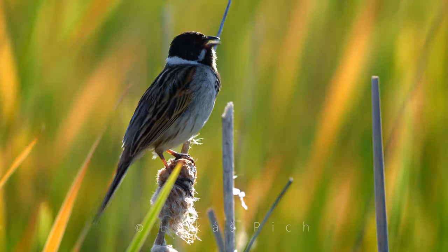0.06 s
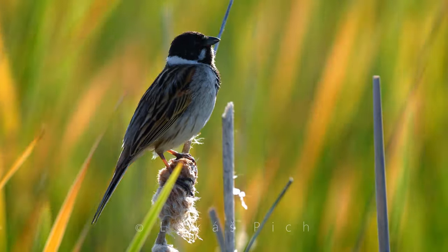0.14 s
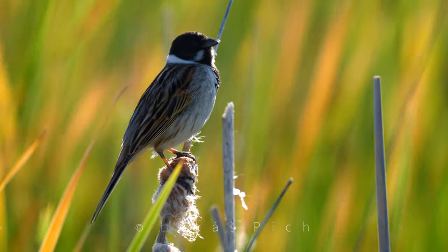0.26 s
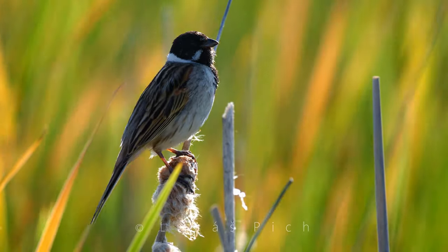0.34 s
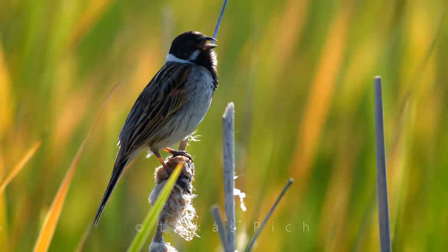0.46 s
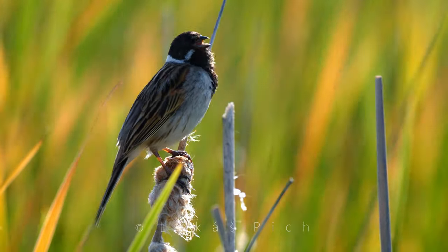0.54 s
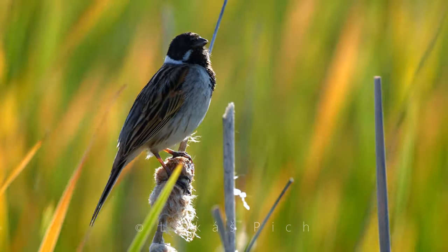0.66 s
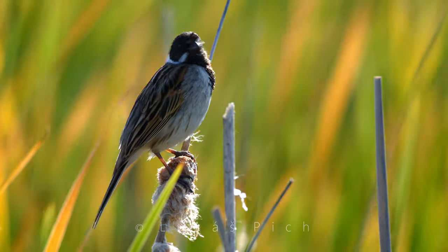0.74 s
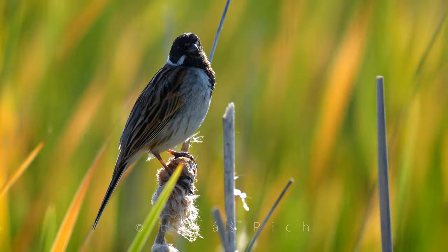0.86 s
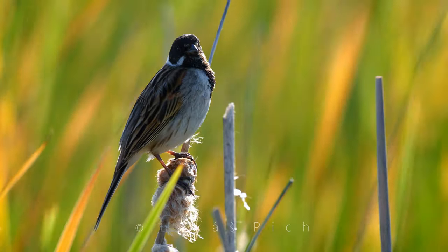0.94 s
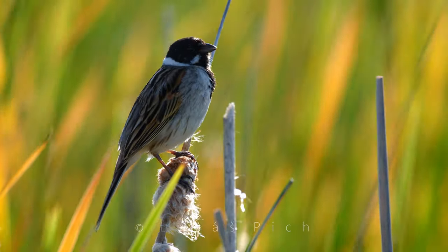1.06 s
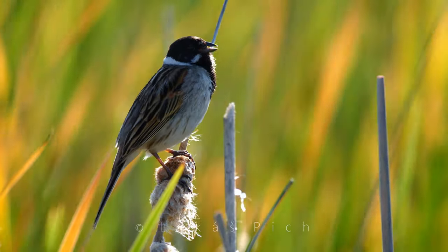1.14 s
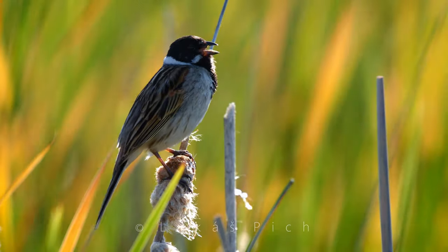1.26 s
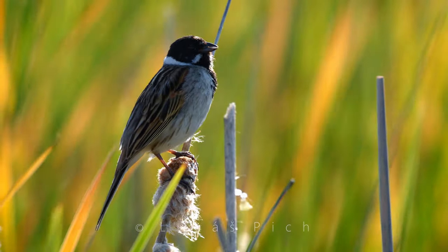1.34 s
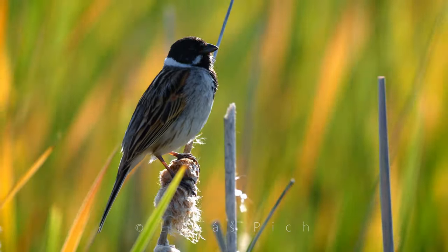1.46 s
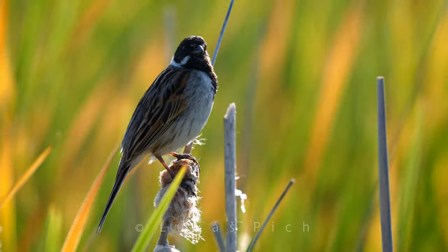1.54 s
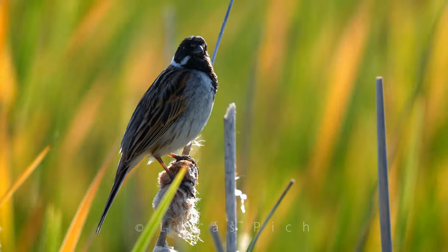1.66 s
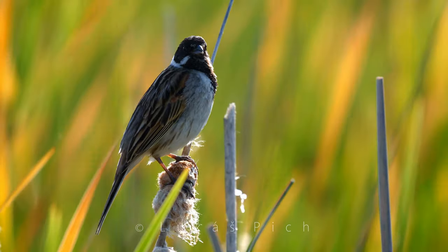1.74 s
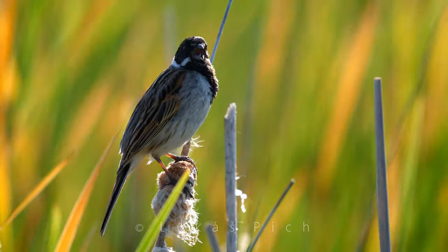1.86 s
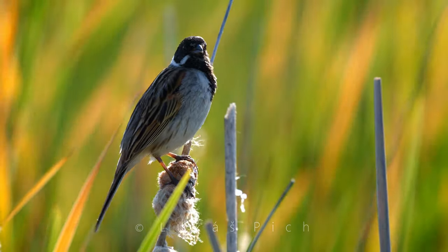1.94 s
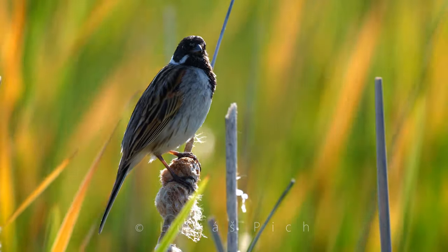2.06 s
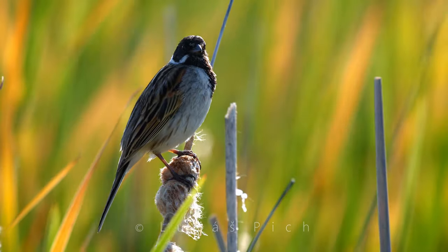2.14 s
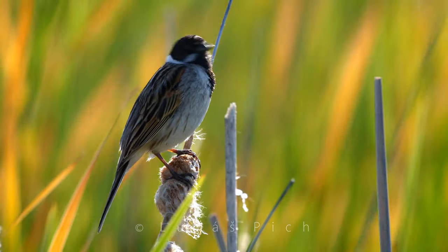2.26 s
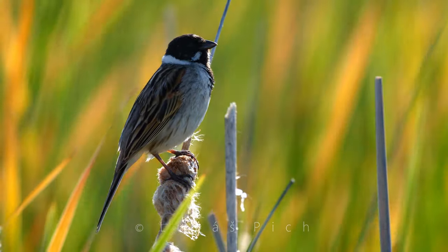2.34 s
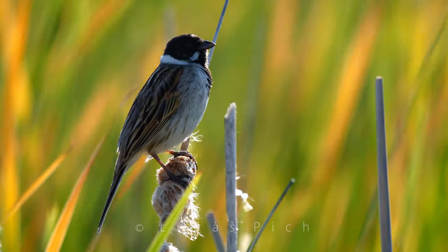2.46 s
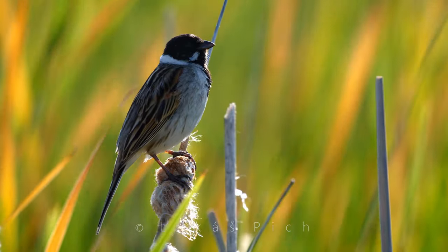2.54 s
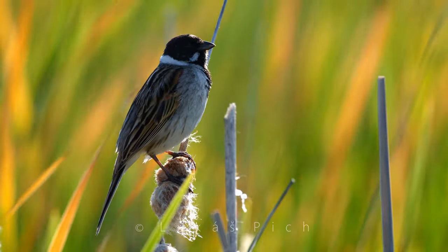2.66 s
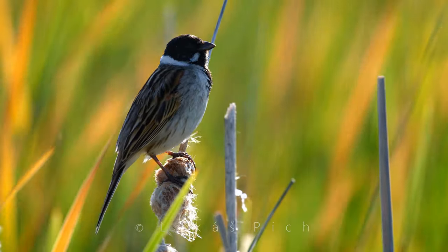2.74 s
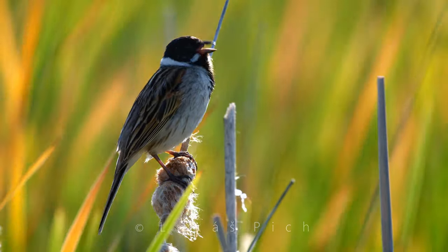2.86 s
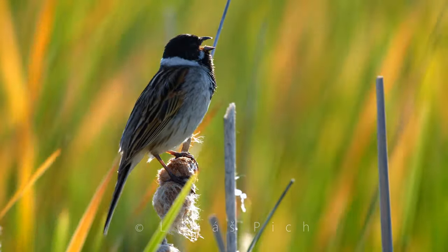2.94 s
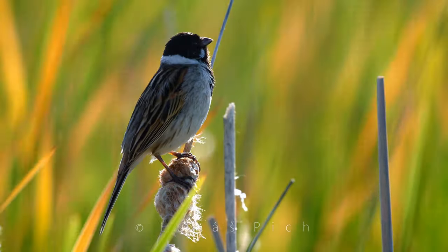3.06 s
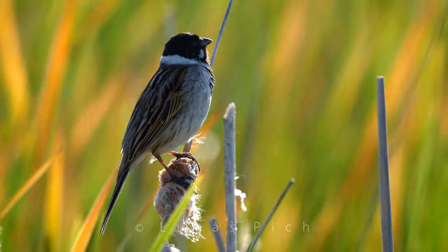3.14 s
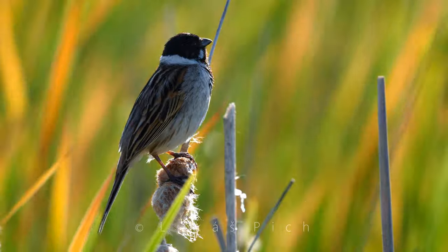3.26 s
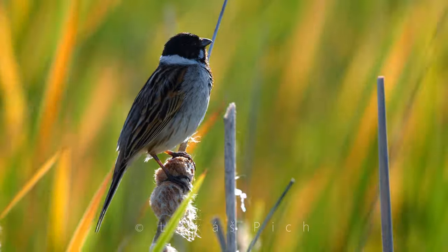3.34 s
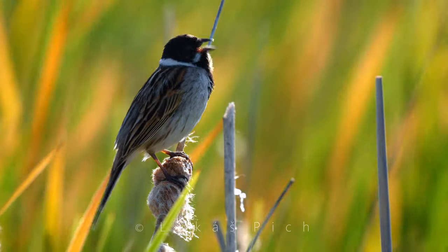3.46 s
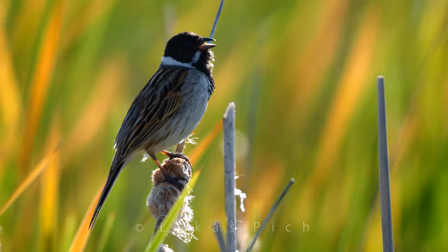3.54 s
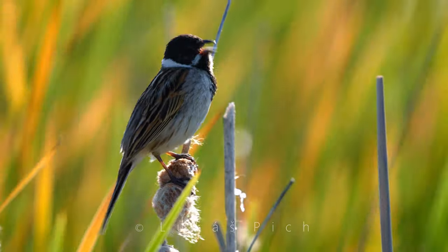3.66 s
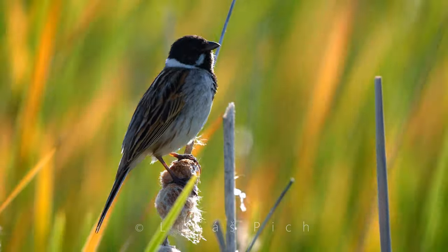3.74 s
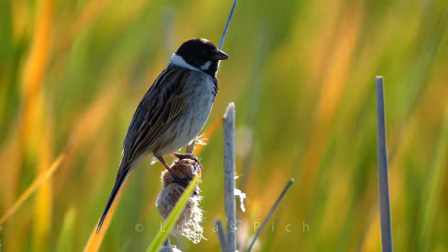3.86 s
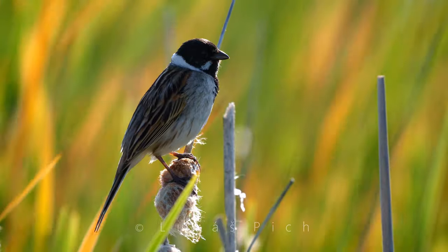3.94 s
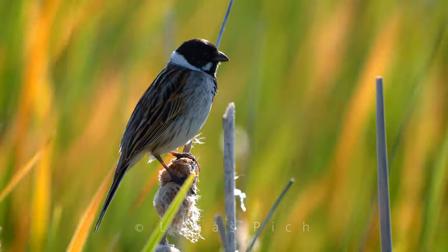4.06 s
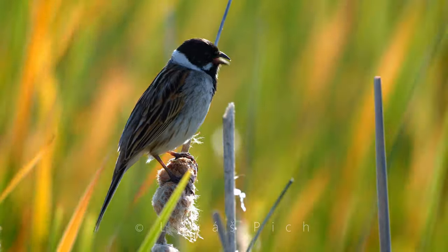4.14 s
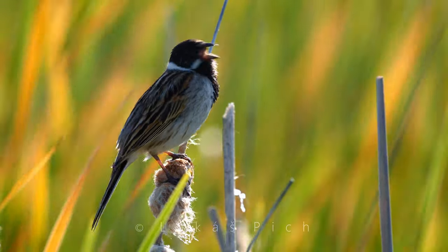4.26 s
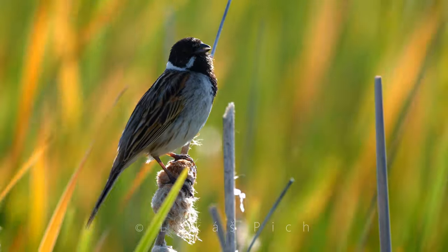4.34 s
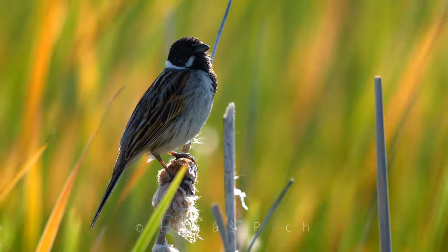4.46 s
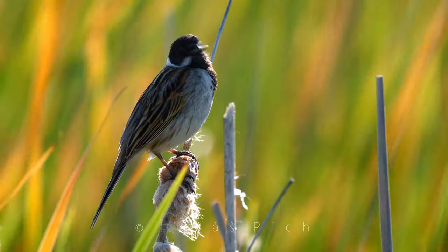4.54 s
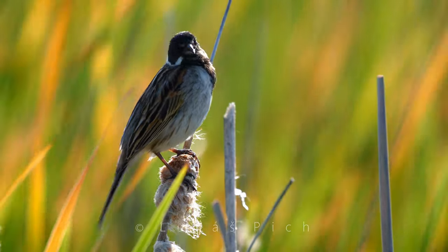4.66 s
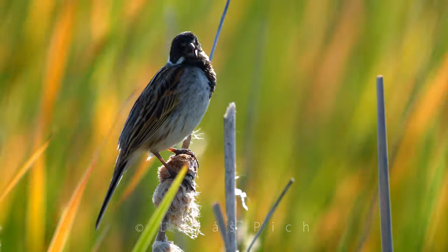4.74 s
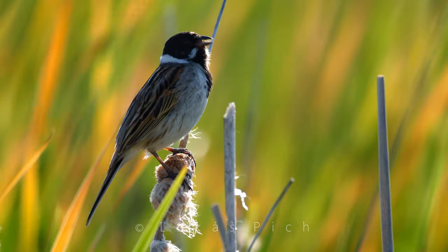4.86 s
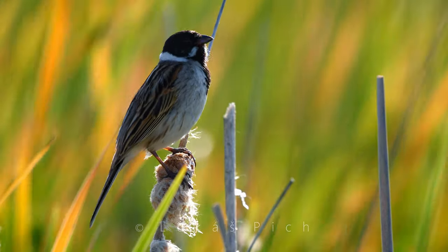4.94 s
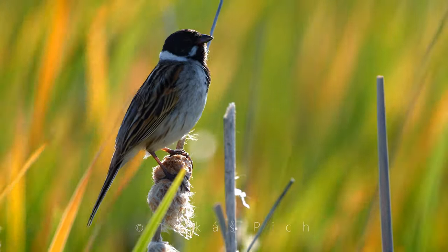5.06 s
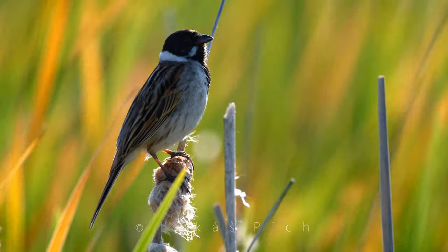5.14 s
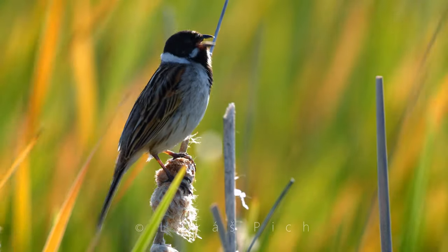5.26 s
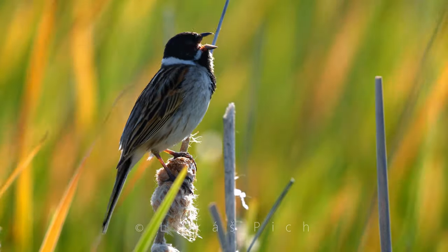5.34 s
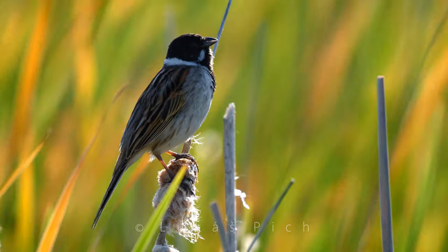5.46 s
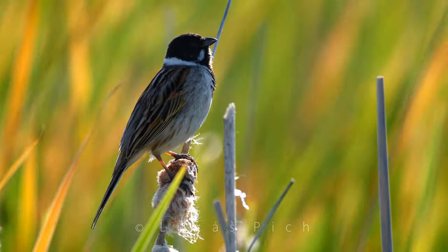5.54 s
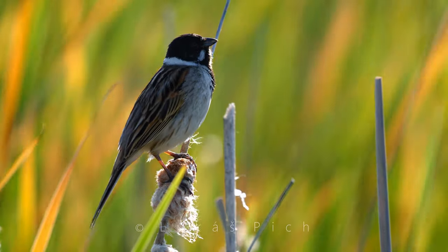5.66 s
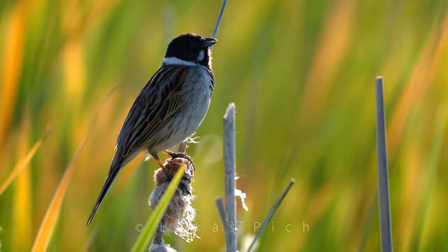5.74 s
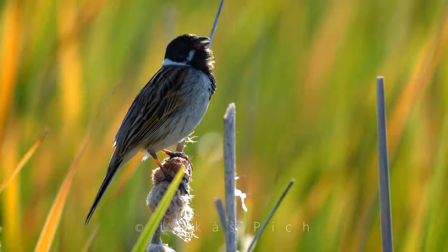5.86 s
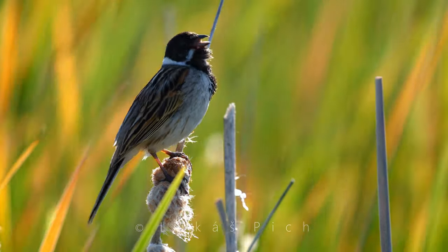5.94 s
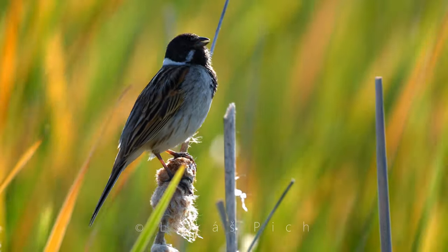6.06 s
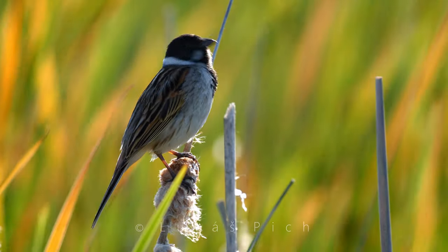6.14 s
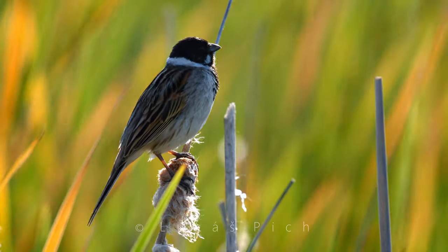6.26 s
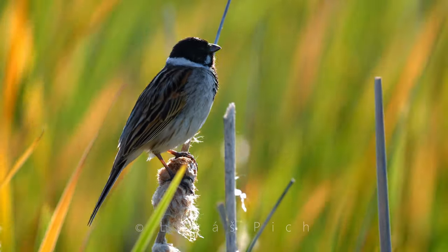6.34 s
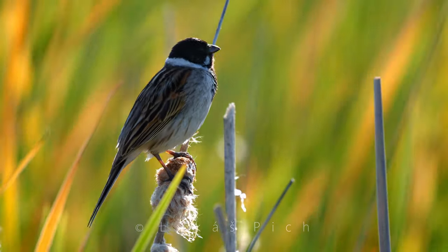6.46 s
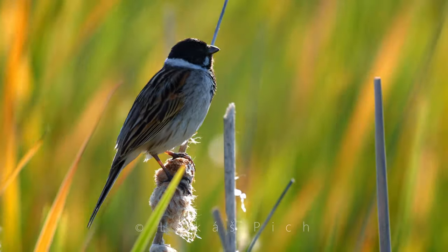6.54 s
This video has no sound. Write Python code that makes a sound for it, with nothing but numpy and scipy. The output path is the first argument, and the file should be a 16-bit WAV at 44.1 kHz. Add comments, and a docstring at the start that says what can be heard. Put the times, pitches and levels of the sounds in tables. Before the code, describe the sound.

Close, high chirps, upward slurs and brief buzzes from one songbird in a quiet marsh, while other birds twitter faintly further off.

```python
"""In an open marsh a male reed bunting sings from a bulrush head: rising slurs, paired chirps, buzzes.
Each note is one gliding tone, filtered by the resonance of throat and beak; a fast trill modulates
its frequency and swings it across that resonance. Scattering in the reed bed adds a short tail.
Other birds call further off, over a soft hush of air, dry stems and a faint low drone."""
import sys
import numpy as np
from scipy import signal
from scipy.fft import rfft, irfft
from scipy.io import wavfile
from scipy.ndimage import uniform_filter1d, map_coordinates

SR = 44100
rng = np.random.default_rng(int(sys.argv[2]) if len(sys.argv) > 2 else 0)


def put_to_file(sound):
    """Save the sound as 16-bit audio at rate SR, in the file named by the first command-line argument."""
    columns = np.atleast_2d(sound).T  # one column per channel
    safe = np.clip(columns, -1, 1)
    whole_steps = np.round(safe * 32767)
    wavfile.write(sys.argv[1], SR, whole_steps.astype(np.int16))


N = 291060


def undb(db):
    """Amplitude ratio of a level in decibels."""
    return 10 ** (np.asarray(db) / 20)


def unit(x):
    """Normalisation to rms 1."""
    return x / np.sqrt(np.mean(x ** 2))


def add(track, start, sound):
    """Superposition: a sound sums into a track from a start time on."""
    at = int(round(start * SR)) + np.arange(len(sound))
    inside = (at >= 0) & (at < N)
    track[at[inside]] += sound[inside]


def wander(size, rate):
    """Random modulation: a smooth curve of spread near 1, with rate new values a second."""
    steps = np.arange(size) * rate / SR
    return map_coordinates(rng.standard_normal(4096), [steps + 8], order=2, mode="wrap")


def coloured(spectrum):
    """Spectral shaping: noise of rms 1 that follows (frequency [Hz], relative level [dB]) points."""
    hz, db = np.transpose(spectrum)
    bins = np.maximum(np.arange(N // 2 + 1) * SR / N, 1)
    gain = undb(np.interp(np.log(bins), np.log(hz), db))
    return unit(irfft(rfft(rng.standard_normal(N)) * gain, N))


def resonance(x, hz, width_hz):
    """A second-order resonator, gain 1 at its centre."""
    return signal.lfilter(*signal.iirpeak(hz, hz / width_hz, fs=SR), x)


def syrinx(hz, second_db, third_db):
    """Harmonic series: three partials whose phase is the integral of a frequency curve."""
    phase = 2 * np.pi * np.cumsum(hz) / SR
    partials = enumerate((0, second_db, third_db), 1)
    return sum(undb(db) * np.sin(k * phase) * (k * hz < SR / 2) for k, db in partials)


def arc(length, start_hz, middle_hz, end_hz):
    """A parabolic glide through three frequencies, and its rounded amplitude envelope."""
    u = np.linspace(0, 1, int(length * SR))
    parabola = np.polyfit([0, .5, 1], [start_hz, middle_hz, end_hz], 2)
    return np.polyval(parabola, u), np.sqrt(np.abs(np.sin(np.pi * u)))


def ramp(t, length):
    """A raised-cosine step from 0 to 1 that starts at t = 0."""
    return np.sin(np.pi / 2 * np.clip(t / length, 0, 1)) ** 2


def sing(t, hz, db, attack_s, release_s):
    """Jitter and shimmer: the bunting's nearly pure tone, slightly unsteady in pitch and airflow."""
    hz = hz * (1 + .0008 * wander(len(t), 700))
    airflow = undb(db + wander(len(t), 140)) * ramp(t - t[0], attack_s) * ramp(t[-1] - t, release_s)
    return airflow * syrinx(hz, -56, -48)


def swing(cycle, depth_hz):
    """Frequency modulation of a trill: lowest at whole cycles, slightly uneven in depth."""
    return -depth_hz * np.cos(2 * np.pi * cycle) * (1 + .06 * wander(len(cycle), 120))


def scatter(x, near_db, near_t60, far_db, far_t60):
    """Multiple scattering: exponentially decaying echoes from close stems and the wider reed bed."""
    t = np.arange(SR) / SR
    response = 0
    for db, t60 in ((near_db, near_t60), (far_db, far_t60)):
        echo = rng.standard_normal(SR) * undb(-60 * t / t60) * (1 - np.exp(-t / .0039))
        response = response + undb(db) * echo / np.linalg.norm(echo)
    return signal.fftconvolve(x, response)[:N]


# air over the marsh: (frequency [Hz], relative spectral density [dB])
HUSH_SPECTRUM = [(25, -13.5), (80, -15.5), (105, -5.5), (145, 3), (230, -4), (340, -1), (580, 1.5),
                 (900, -4), (1400, -6.5), (2200, -10), (4000, -10), (7000, -17), (12000, -22.5),
                 (16000, -23.5)]
def hush(level_db=-54.5):
    """Broadband ambient noise with a slight, slow amplitude modulation."""
    return coloured(HUSH_SPECTRUM) * undb(level_db + .4 * wander(N, 3))


# leaves brushing together: (peak time [s], half length [s], level [dB])
LEAF_RUSTLES = [(2.366, 0.022, -64), (2.84, 0.084, -66), (3.13, .04, -63), (3.55, 0.37, -68),
                (4.04, 0.039, -75)]
# dry stems ticking: (time [s], level [dB])
STEM_TICKS = [(3.139, -43), (3.779, -50), (4.0297, -46), (4.246, -47), (6.1302, -47.5), (6.316, -44)]
def reeds(steady_db=-76, tick_s=.0022):
    """Friction noise swells as leaves brush together; stem ticks are damped noise transients."""
    t = np.arange(N) / SR
    swells = sum(undb(db) * np.exp(-((t - at) / half) ** 2) for at, half, db in LEAF_RUSTLES)
    rubbing = (undb(steady_db) + swells) * undb(1.2 * wander(N, 150))
    out = rubbing * coloured([(500, -16.5), (4000, -1), (9000, 4), (12500, 0), (16000, -1.5)])
    t = t[:SR // 50]
    for start, db in STEM_TICKS:
        add(out, start, undb(db) * np.exp(-t / tick_s) * rng.standard_normal(len(t)))
    return out


# envelope of a distant drone: (time [s], level [dB])
DRONE_LEVELS = [(0, -85), (2.5, -82), (3.0, -64), (3.602, -79), (4.6, -69.5), (5.4, -64.5), (6.0, -81),
                (6.6, -78)]
def drone(hz=316.7, width_hz=41):
    """Narrow-band noise: two resonators in series leave a low, wavering hum."""
    band = resonance(rng.standard_normal(N), hz, width_hz)
    band = resonance(band, hz, width_hz)
    return unit(band) * undb(np.interp(np.arange(N) / SR, *np.transpose(DRONE_LEVELS)))


def chorus(count=220, level_db=-62, spread_db=3, fading_db=4):
    """A diffuse field: very distant birds twitter at random, slowly quietening, heard only as echoes."""
    out = np.zeros(N)
    for when, length, height, bend, size in rng.random((count, 5)):
        centre_hz = 1300 * 3.4 ** height
        start_hz, end_hz = centre_hz * (1 + .271 * (bend - .5)), centre_hz * (1 - .22 * (bend - .5))
        hz, swell = arc(.015 + .06 * length, start_hz, centre_hz, end_hz)
        db = level_db + spread_db * (2 * size - 1) + fading_db * (.5 - when)
        add(out, when * N / SR, undb(db) * swell * syrinx(hz, -16, -39))
    return scatter(out, -.63, .09, .42, .2)


# airflow through a slur: (time from the crest before stretching [s], drive [dB])
SLUR_AIRFLOW = [(-.188, -33), (-.165, -20.5), (-.14, -19.5), (-.1, -15.5), (-.06, -12), (-.02, -14),
                (-.004, -18.5), (.008, -20), (.016, -34)]
# the bunting's slurs: (crest time [s], crest frequency [Hz], gain [dB], stretch [ratio])
RISING_SLURS = [(.0872, 4860, 2, 1.14), (3.7105, 4920, -.4, .97), (6.0815, 4850, .4, .96)]
def slurs(climb_oct_per_s=4.3, surge_oct=.125, surge_s=.018, hook_oct_per_s=2.8, dip_oct=.15, dip_s=.009):
    """Frequency sweep: each whistle dips, climbs ever faster and hooks over at the top."""
    out = np.zeros(N)
    knots, drive = np.transpose(SLUR_AIRFLOW)
    for at, crest_hz, db, stretch in RISING_SLURS:
        t = np.arange(knots[0] * stretch, knots[-1] * stretch, 1 / SR)
        u = t / stretch  # the settings run on this unstretched time
        before, after = np.minimum(u, 0), np.maximum(u, 0)
        climb = climb_oct_per_s * before + surge_oct * np.expm1(before / surge_s)
        dip = dip_oct * np.exp((u[0] - u) / dip_s)
        hz = crest_hz * 2 ** uniform_filter1d(dip + climb - hook_oct_per_s * after, size=500)
        add(out, at + t[0], sing(t, hz, db + np.interp(u, knots, drive), .003, .0036))
    return out


def beak_hiss(song, gain_db=-47):
    """Amplitude-modulated noise: a trace of high hiss follows the envelope of the song."""
    envelope = uniform_filter1d(np.abs(song), size=600)
    hiss = coloured([(2000, -26), (8000, 9), (11000, -2.5), (13500, 2.5), (16000, -9)])
    return undb(gain_db) * envelope * hiss


# a distant bird's low chatter: (time [s], level of the fundamental [dB])
CLUCKS = [(0.164, -49), (0.731, -47.5), (0.7555, -53), (0.7847, -51), (0.947, -49), (0.998, -48.5),
          (1.2208, -47.5), (2.0263, -53.5), (2.1376, -50.5), (4.645, -52.5)]
def chatter(pitch_hz=1500, rasp_hz=220, length=.016):
    """Random frequency modulation roughens short clucks with a strong second harmonic."""
    out = np.zeros(N)
    for start, db in CLUCKS:
        hz, swell = arc(length, .9 * pitch_hz, pitch_hz, .9 * pitch_hz)
        add(out, start, undb(db) * swell * syrinx(hz + rasp_hz * wander(len(hz), 900), 1.5, -23))
    return out


# distant whistles: (time [s], length [s], start [Hz], middle [Hz], end [Hz], level [dB])
FAR_WHISTLES = [ (0.338, 0.061, 5680, 5040, 4880, -43), (0.38, 0.025, 4500, 2970, 1800, -46.5),
                (0.447, 0.031, 2130, 2720, 2670, -41), (0.64, 0.08, 2180, 2555, 2240, -44.5),
                (0.817, 0.028, 3100, 2590, 3000, -39.5), (0.845, 0.032, 2870, 3090, 2920, -44.5),
                (0.873, 0.074, 2987, 2833, 2550, -34.5), (1.011, 0.044, 4880, 4960, 4800, -37),
                (1.19, 0.049, 4120, 3910, 3440, -40), (1.229, .112, 4980, 4620, 5440, -37),
                (1.233, 0.08, 4430, 4150, 3980, -37.5), (1.387, 0.105, 2870, 2523, 2647, -40),
                (1.927, 0.14, 1783, 2036, 2100, -56), (2.804, 0.014, 4080, 4350, 4270, -43.5),
                (3.967, 0.048, 3220, 3700, 4130, -54), (4.24, 0.057, 2780, 1755, 1216, -49.5),
                (5.3, 0.14, 2410, 2465, 2460, -61), (5.513, 0.078, 3690, 3240, 3250, -52),
                (6.593, .019, 3880, 3520, 3400, -40.5)]
# distant hoarse notes: (time [s], length [s], frequency [Hz], level [dB], rasp [0-1])
FAR_RASPS = [ (.407, 0.046, 3180, -40.5, 0.52), (0.447, .039, 3230, -38.5, 0.3),
             (0.729, 0.094, 2635, -48.5, 0.38), (0.926, 0.097, 2820, -42.5, 0.39),
             (1.053, 0.033, 4520, -39.5, .3), (1.087, 0.042, 4170, -39.5, .35),
             (1.158, 0.093, 2854, -42.5, 0.4), (1.171, 0.043, 5520, -47.5, 0.9),
             (1.227, .095, 3302, -37, 0.36), (1.48, 0.082, 3910, -41.5, .55), (1.386, 0.07, 1400, -54.5, 0),
             (1.64, 0.1, 4090, -44, 0.16), (1.657, 0.31, 1368, -63, 0.1), (2.499, .67, 1099, -62.5, 0.22),
             (2.082, 0.1, 4140, -46, 0.23), (2.334, 0.14, 4090, -45, 0.19), (4.599, 0.03, 4980, -44, 0.76),
             (4.64, 0.21, 3660, -45.5, 0.3), (4.953, 0.17, 3750, -51.5, 0.16),
             (5.076, 0.19, 3470, -41, 0.5), (5.178, 0.082, 2954, -46.5, 0.7),
             (5.266, 0.11, 3230, -56.5, .1), (5.689, .13, 2123, -49.5, 0.76),
             (6.195, 0.13, 2080, -51, 0.74), (6.506, 0.031, 6230, -49, 0.9)]
def far_birds(waver_hz=35, rasp_hz=380, sag=.018):
    """Modulation sidebands: slight jitter leaves a whistle clear, deep jitter makes a note hoarse."""
    notes = [(*row, waver_hz) for row in FAR_WHISTLES]
    for start, length, hz, db, rasp in FAR_RASPS:
        notes.append((start, length, hz * (1 + sag), hz, hz * (1 - sag), db, rasp * rasp_hz))
    out = np.zeros(N)
    for start, length, *pitches, db, jitter_hz in notes:
        hz, swell = arc(length, *pitches)
        add(out, start, undb(db) * swell * syrinx(hz + jitter_hz * wander(len(hz), 600), -43, -44.5))
    return out


def drop(length, db, start_hz=4470, low_hz=3060, swell_db=19):
    """A linear downward sweep, driven hardest past its middle, opens a chirp."""
    t = np.arange(-length, 0, 1 / SR)
    u = 1 + t / length
    drive = db + swell_db * (np.sin(np.pi * u ** 1.53) - 1)
    return sing(t, start_hz + (low_hz - start_hz) * u, drive, .0062, .00036)


def warble(pitch_hz, trill_hz, db, low_hz=3060, leap_s=.0082, length=.051, sag_hz_per_s=13500,
           depth_hz=700, push_db=13, trough_db=4, swell_db=9):
    """Coupled frequency and amplitude modulation: a leap into a sinking trill, driven in its troughs."""
    t = np.arange(0, length, 1 / SR)
    cycle = trill_hz * (t - .015)  # first trough at 15 ms
    leapt, trilling = ramp(t, leap_s), ramp(t - leap_s / 2, leap_s)
    hz = low_hz + (pitch_hz - low_hz) * leapt - sag_hz_per_s * t + trilling * swing(cycle, depth_hz)
    drive = db + push_db * (1 - leapt) + swell_db * (np.sin(np.pi * t / length) - 1)
    drive += trough_db * trilling * np.cos(2 * np.pi * cycle)
    return sing(t, hz, drive, .0014, .0032)


# the bunting's paired chirps: (turning time [s], drop length [s], warble frequency [Hz],
# trill rate [Hz], drop drive [dB], warble drive [dB])
CHIRP_PAIRS = [(0.5331, 0.024, 5780, 107.5, -20, -20), (0.6235, 0.027, 5850, 102.4, -11, -19.5),
               (4.7557, .0233, 5540, 124.6, -16, -18), (4.8556, 0.031, 5404, 116.6, -9, -15)]
def chirps():
    """Sweep reversal: each chirp drops to its lowest frequency, then leaps into a warble."""
    out = np.zeros(N)
    for at, drop_s, hz, trill_hz, drop_db, warble_db in CHIRP_PAIRS:
        add(out, at - drop_s, drop(drop_s, drop_db))
        add(out, at, warble(hz, trill_hz, warble_db))
    return out


# a neighbouring bird's notes: (time [s], length [s], top frequency [Hz], level [dB])
ARCHED_NOTES = [(1.299, .018, 2014, -44.5), (2.018, 0.026, 2170, -51.5), (2.441, 0.015, 2410, -48.5),
                (2.728, 0.018, 2360, -45), (3.019, 0.021, 2315, -47), (3.315, 0.035, 1365, -47.5),
                (3.538, 0.049, 1406, -46.5), (3.784, 0.043, 1405, -48.5), (4.007, 0.057, 1476, -48.5)]
def neighbour(foot=.68):
    """Harmonic timbre: a clear octave partial makes low, arched notes reedy."""
    out = np.zeros(N)
    for start, length, top_hz, db in ARCHED_NOTES:
        hz, swell = arc(length, foot * top_hz, top_hz, foot * top_hz)
        add(out, start, undb(db) * swell * syrinx(hz, -6, -18))
    return out


# a thin call repeated from the reeds: (time [s], plateau frequency [Hz], level [dB])
HIGH_CALLS = [(1.613, 7470, -58), (1.96, 7500, -56), (2.308, 7600, -52.5), (2.596, 7280, -48),
              (2.888, 7320, -49), (3.183, 7500, -51), (3.394, 6850, -48), (3.624, 7020, -49.5),
              (3.873, 7000, -50.5), (4.103, 7000, -51)]
def thin_caller(length=.082, rise_s=.0095, leap=.38, hoarse=.023):
    """Exponential approach: each call leaps to a high plateau, where its jitter settles and it fades."""
    out = np.zeros(N)
    t = np.arange(int(length * SR)) / SR
    swell = np.abs(np.sin(np.pi * (t / length) ** .59))
    for start, top_hz, db in HIGH_CALLS:
        jitter = hoarse * (1.3 - t / length) * wander(len(t), 1300)
        hz = top_hz * (.99 - leap * np.exp(-t / rise_s) + jitter)
        add(out, start, undb(db) * swell * syrinx(hz, -44, -47.5))
    return out + scatter(out, -1.5, .14, 0, .37)


def lisp(length, pitch_hz, db, sag_hz_per_s=11000, hook_hz=1080, hook_s=.0044, swell_db_per_s=520):
    """Exponential growth: a thin whistle swells as it sags, then hooks upward."""
    t = np.arange(-length, 0, 1 / SR)
    hz = pitch_hz - sag_hz_per_s * (t + length / 4) + hook_hz * np.exp(t / hook_s)
    return sing(t, hz, db + swell_db_per_s * t, .014, .0027)


def buzz(glide_s, trill_s, pitch_hz, db, fade_db_per_s, above_hz=1190, settle_s=.015, trill_hz=132,
         depth_hz=360, onset_s=.03, rise_db_per_s=230, choke_db=9, build_db=1.5, lead_cycles=.12):
    """Pulsed modulation: a glide into a trill; airflow builds in each swing and chokes at the trough."""
    t = np.arange(0, glide_s + trill_s, 1 / SR)
    u = t - glide_s
    cycle = trill_hz * u * (1 - 1.23 * u)  # the trill slows
    trilling = ramp(u + onset_s / 2, onset_s)
    hz = pitch_hz + above_hz * np.exp(-t / settle_s) + trilling * swing(cycle, depth_hz)
    closing = np.exp(4 * (np.cos(2 * np.pi * (cycle + lead_cycles)) - 1))
    pulse_db = build_db * (1 - np.sin(2 * np.pi * cycle)) - choke_db * closing
    drive = db + np.minimum(rise_db_per_s * u, -fade_db_per_s * u) + trilling * pulse_db
    return sing(t, hz, drive, .0015, .014)


# the bunting's "tseer" notes: (break time [s], glide [s], trill [s], trill centre [Hz], drive [dB],
# decay [dB/s], lisp frequency [Hz], lisp drive [dB])
TSEER_NOTES = [(1.8766, 0.032, 0.07, 4180, -13, 90, 5200, -18),
               (2.943, 0.029, 0.081, 4093, -16.5, 48, 5230, -25.5),
               (4.2598, 0.028, 0.075, 4088, -13.5, 28, 5400, -18),
               (5.371, 0.026, 0.081, 4133, -12, 138, 5190, -13.5)]
def tseers(lisp_s=.047):
    """Roughness from fast modulation: a smooth lisp breaks off into a buzz."""
    out = np.zeros(N)
    for at, *buzz_settings, lisp_hz, lisp_db in TSEER_NOTES:
        add(out, at - lisp_s, lisp(lisp_s, lisp_hz, lisp_db))
        add(out, at, buzz(*buzz_settings))
    return out


# the bunting's flicks before a slur: (time [s], length [s], top trill centre [Hz], drive [dB])
LEAD_IN_FLICKS = [(3.481, 0.061, 7080, -31.5), (5.856, 0.063, 7190, -28)]
def flicks(start_hz=2850, leap_s=.0093, fall_hz_per_s=54000, trill_hz=140, depth_hz=400, swell_db=5):
    """A frequency-modulated sweep: a leap to the top of the range, then a trilled slide down."""
    out = np.zeros(N)
    for at, length, top_hz, db in LEAD_IN_FLICKS:
        t = np.arange(0, length, 1 / SR)
        cycle = trill_hz * (t - leap_s) + .5
        leap = (top_hz - start_hz + swing(cycle, depth_hz)) * ramp(t, leap_s)
        hz = start_hz + leap - fall_hz_per_s * np.maximum(t - leap_s, 0)
        add(out, at, sing(t, hz, db + swell_db * np.sin(np.pi * t / length), .0076, .02))
    return out


def squawk(start=6.364, length=.045, pitch_hz=1650, fall=.9, rasp_hz=90, level_db=-48):
    """Overtones stronger than the fundamental make one jittery call harsh and nasal."""
    hz, swell = arc(length, pitch_hz, pitch_hz, fall * pitch_hz)
    phase = 2 * np.pi * np.cumsum(hz + rasp_hz * wander(len(hz), 745)) / SR
    tone = sum(undb(level_db + db) * np.sin(k * phase) for k, db in enumerate((.5, 1.5, 4.5, -8), 1))
    out = np.zeros(N)
    add(out, start, swell * tone)
    return out


def scene(pan_db=-.2):
    """Superposition of the close bird, distant ones and the hush, nearly all from straight ahead."""
    voice = slurs() + flicks() + chirps() + tseers()
    song = resonance(voice, hz=4526, width_hz=1170)  # throat and beak
    far = far_birds()
    low = neighbour() + chatter() + squawk()
    song = song + beak_hiss(song) + scatter(song, -19.5, .084, -14.5, .27)
    far = far + scatter(far, -10.5, .11, -8.5, .65)
    low = low + scatter(low, -16, .08, -12, .5)
    background = far + low + hush() + thin_caller() + chorus() + reeds() + drone()
    return song * undb(np.array([[pan_db], [-pan_db]]) / 2) + background


def record(dry, cutoff_hz=15450):
    """Soft saturation rounds the loudest peaks very slightly; a low-pass filter cuts the top."""
    rounded = np.tanh(.6 * dry) / .6
    return signal.sosfilt(signal.ellip(10, .1, 80, cutoff_hz, fs=SR, output="sos"), rounded)


dry = scene()
out = record(dry)
put_to_file(out)
```